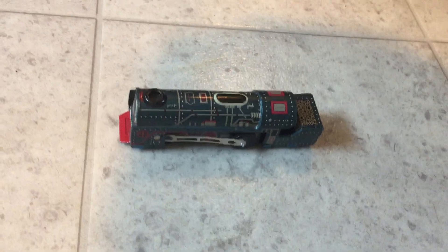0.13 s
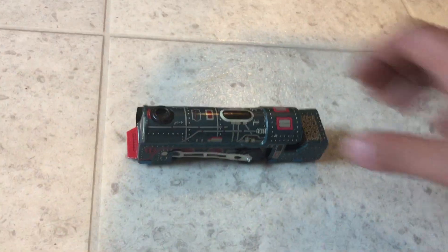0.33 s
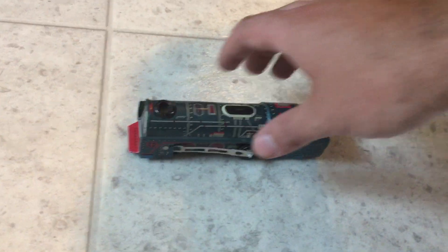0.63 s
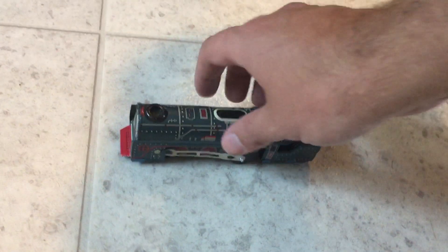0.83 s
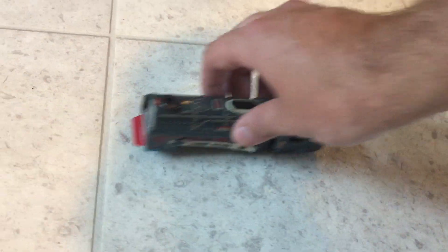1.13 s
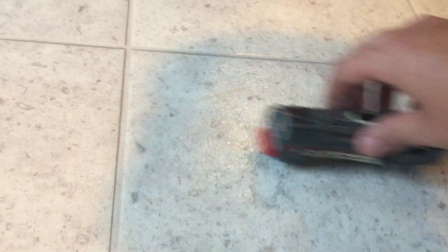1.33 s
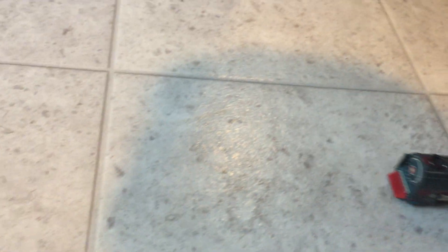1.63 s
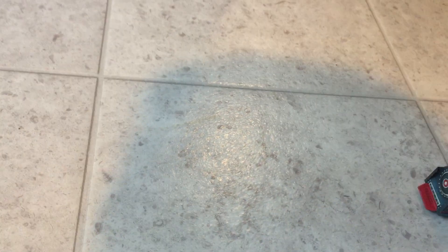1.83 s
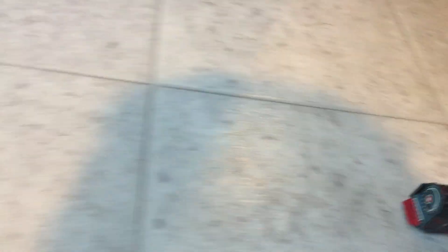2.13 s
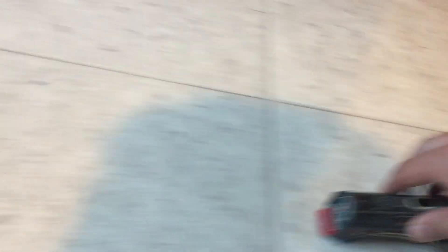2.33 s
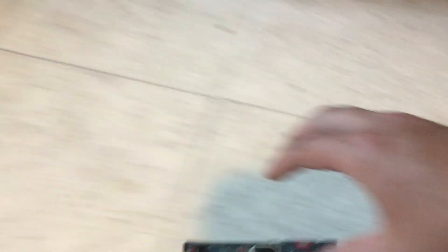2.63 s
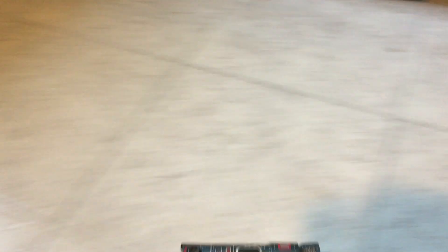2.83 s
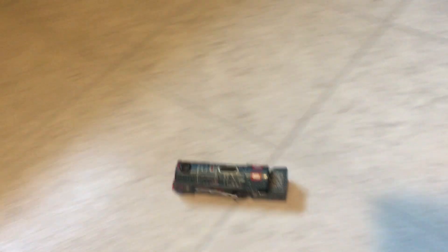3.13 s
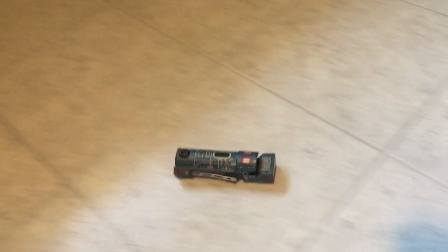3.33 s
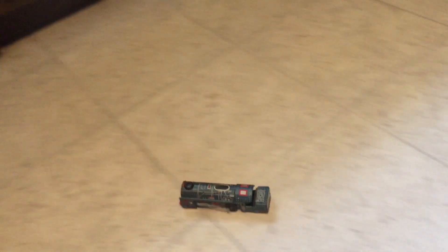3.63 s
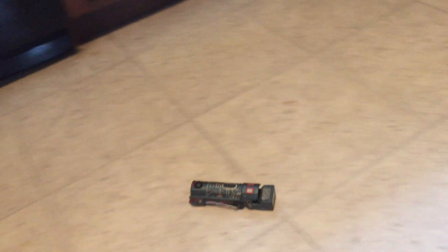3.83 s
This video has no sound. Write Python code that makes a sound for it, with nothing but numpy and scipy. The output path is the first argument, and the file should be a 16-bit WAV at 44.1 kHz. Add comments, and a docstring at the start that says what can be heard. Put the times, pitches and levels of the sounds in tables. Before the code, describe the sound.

Small friction-drive toy rattles, revs up with a rising rasp, then rolls away with grinding whir

```python
"""A tin friction train on a tiled floor. A low room hum comes first: coloured noise and a wavering sine.
A hand takes the toy up and sets it down: noise-burst clicks, scraping scuffs, panel knocks, dull bumps.
It pushes: the gears spin up a flywheel with a rising rasp of one impact per tooth, and the mesh whines.
Let go, the toy coasts away: the teeth slow, grind and rattle in the resonant tin shell,
the wheels rumble as low noise, and a thin squeal of narrow-band noise comes and goes."""
import sys
import numpy as np
from scipy import signal
from scipy.fft import rfft, irfft
from scipy.io import wavfile

SR = 44100
rng = np.random.default_rng(int(sys.argv[2]) if len(sys.argv) > 2 else 0)


def master(y):
    """Save y as 16-bit WAV."""
    cut = np.clip(np.atleast_2d(y).T, -1, 1)
    pcm = np.round(cut * 32767)  # scale
    wavfile.write(sys.argv[1], SR, pcm.astype(np.int16))


N = 176400
T = np.arange(N) / SR

# Gear speed. Each row: time in seconds, rate in teeth meshing per second.
MESH_RATE = [(2.13, 76), (2.16, 163), (2.245, 486), (2.38, 1050), (2.46, 1200), (2.55, 1230), (3.2, 946),
             (4.0, 670)]
# Gear force before GEAR_DB, shake and jolts. Each row: time in seconds, level in dB.
GEAR_DRIVE = [(2.13, -43), (2.134, -46), (2.176, -32.5), (2.3, -21), (2.426, -20.5), (2.51, -22),
              (3.776, -27.5), (3.962, -28), (4.0, -33.5)]
# Jolts of the rolling toy: gears rattle harder or briefly unload. Each row: time in seconds, change in dB.
JOLTS = [(2.28, -3), (2.325, -4), (2.545, -1), (2.642, -2), (2.665, 0), (2.72, 1), (2.889, 1.5),
         (3.022, -3), (3.129, -5.5), (3.215, 2.5), (3.385, 3.5), (3.485, 4.5), (3.605, 0.5), (3.654, -4.5),
         (3.681, 2), (3.755, -1.5), (3.855, 1), (3.9, -0.5), (3.965, 1)]
# Shell colour under the hand, just let go, further off. Each row: frequency in Hz, relative dB per Hz.
HELD_COLOUR = [(260, -72), (450, -26.5), (624, -15.5), (723, -19.5), (852, -14.5), (945, -6), (1160, -5),
               (1270, -5), (1470, 5.5), (1840, -3.5), (1930, 0), (2230, -1), (2370, 0), (2750, 1.5),
               (2960, -2), (3240, 3.5), (4980, -6.5), (5600, -5), (6040, 4), (7430, -0.5), (9560, 3.5),
               (10600, -7.5), (11600, -1), (13300, -1.5), (15600, -5.5)]
FREE_COLOUR = [(260, -52), (450, -34), (642, -16), (723, -25), (931, -11.5), (1050, -15), (1290, -8),
               (1370, -1), (1500, 2), (1900, -6), (2110, -1), (2300, -3.5), (2670, -2.5), (3240, -4.5),
               (3490, -2.5), (3700, -7), (3980, -4), (4490, -12.5), (5860, -3.5), (6900, -5), (7650, -10.5),
               (9420, -4.5), (10300, -10), (12700, -7.5), (15600, -10.5)]
AWAY_COLOUR = [(260, -60), (450, -44), (633, -17.5), (779, -22.5), (959, -12.5), (1050, -20), (1180, -10),
               (1310, -9), (1520, 2.5), (1640, -3.5), (1760, -0.5), (1900, -12), (2110, 1.5), (2270, -4.5),
               (2750, -2), (3190, -5), (3490, -3.5), (4620, -15.5), (5860, -5), (6800, -2), (7770, -11.5),
               (9560, -4.5), (10500, -12.5), (11400, -8), (15600, -10.5)]
# Modes of the tin shell. Each row: frequency in Hz, width in Hz, lift in dB.
TIN_MODES = [(1180, 13, 5.5), (1457, 33, 3), (1742, 20, 5), (2080, 50, 3.5), (2750, 36, 5), (3040, 9.9, 2),
             (3450, 30, 3), (4150, 52, 4), (5324, 120, 3.5), (5930, 95, 1), (8460, 104, 4),
             (9600, 115, 3.5), (11290, 145, 4.5), (12900, 230, 1.5)]
# Edges between the ranges of the shell that the shifting contact favours, in Hz.
CONTACT_EDGES_HZ = [1300, 1900, 2500, 3200, 4600, 6500, 8000, 10500, 12300]
# Clicks of gears and body in the hand. Each row: start in seconds, level in dB before CLICK_DB,
# treble in dB relative to the low part.
CLICKS = [(1.0108, -36, -26), (1.0824, -53, 10), (1.1087, -36, 5), (1.127, -33.5, 3.5), (1.1594, -28, 6),
          (1.1654, -34, -9), (1.1994, -30.5, -10), (1.707, -37, -10), (1.7141, -36.5, 9.5),
          (1.725, -25.5, -8), (1.7572, -30.5, -4), (1.7674, -36, 0), (1.7914, -47, 12),
          (1.8172, -37.5, 5.5), (1.882, -31.5, -14), (1.8882, -30, -7), (1.8928, -26.5, 0),
          (1.8969, -28, 7.5), (1.9072, -30.5, -1), (1.9609, -34, -3), (1.9819, -35.5, 10),
          (2.0017, -32, 14), (2.0132, -34, 12), (2.064, -41, 8), (2.0934, -39.5, 11), (2.1316, -33.5, 5),
          (2.1453, -36.5, 13.5)]
# Click and scuff colour. Each row: frequency in Hz, relative dB per Hz.
CLICK_COLOUR = [(410, -50), (700, -27), (818, -52), (908, -6), (1070, -20), (1530, 4.5), (1740, -7.5),
                (2030, -1), (2310, -3), (2740, -2), (4780, -15.5), (6530, -7.5), (7740, -14.5), (9280, -10),
                (10600, -16), (12800, -13), (15600, -19.5)]
# Wheels creeping and scuffing under the hand. Each row: start in seconds, length in seconds,
# level in dB before ring and colour, treble in dB relative to the low part, favoured ring in Hz.
SCUFFS = [(1.028, 0.17, -57, -2.5, 2000), (1.686, 0.061, -53.5, -13, 2250), (1.73, 0.16, -55.5, -16, 1350),
          (1.86, 0.21, -60, -6, 2620)]
# Knocks on a shell panel. Each row: start in seconds, frequency in Hz, level in dB.
KNOCKS = [(0.883, 2000, -63.5), (1.161, 2000, -43.5), (1.2, 2030, -48), (1.728, 2870, -36),
          (1.892, 2820, -43), (2.003, 3300, -38), (2.093, 3300, -41)]
# Wheels on the tiles. Each row: time in seconds, level in dB.
ROLL_LEVEL = [(2.13, -74), (2.3, -56.5), (2.45, -50), (2.53, -44), (2.6, -59), (2.9, -48.5), (3.3, -48.5),
              (3.5, -54.5), (3.88, -57.5), (3.935, -42), (4.0, -55)]
# Rolling colour. Each row: frequency in Hz, relative dB per Hz.
ROLL_COLOUR = [(45, -29), (72, 7), (110, -11.5), (160, 1), (245, -1.5), (340, -7.5), (480, -16),
               (900, -33.5)]
# Dull bumps of fingers and wheels. Each row: start in seconds, level in dB.
BUMPS = [(.719, -53.5), (.733, -60), (1.2, -61), (1.391, -52), (1.893, -55), (2.002, -62), (2.565, -51),
         (2.725, -45)]
# Bump colour. Each row: frequency in Hz, relative dB per Hz.
BUMP_COLOUR = [(60, -15), (170, 10), (400, -4), (630, 4), (900, -7.5), (1450, 0), (2800, -15), (6000, -44)]
# Room air colour. Each row: frequency in Hz, relative dB per Hz.
AIR_COLOUR = [(26, -39), (45, -6.5), (75, -9), (91, -6), (111, -1.5), (135, -14.5), (173, -3), (205, -15.5),
              (311, -20.5), (369, -29), (617, -31), (1060, -33), (1140, -33), (2050, -36), (2610, -40),
              (3420, -40), (4260, -42), (15600, -57)]

GEAR_DB, SHELL_DB, TEETH_PER_TURN = 0.5, -1.69, 27
TOOTH_SPREAD_DB, TOOTH_JITTER_S = 3.5, .00017
BACKLASH_PERIODS = .3   # timing spread of the unloaded teeth, in tooth periods
GRIT_PER_S, GRIT_DB, GRIT_SPREAD_DB = 3000, 3.5, 2   # scraping between the teeth
WOBBLE_DB, FLUTTER_DB, FLUTTER_HZ = 0.5, 1.04, 32.4   # the loose axle shakes the mesh
HELD_SHAKE = 0.27   # share of the shake left under the hand
JOLT_S = 0.0051
CONTACT_DB, CONTACT_HZ = 1.97, 22
RELEASE_S, RELEASE_FADE_S = 2.516, 0.1   # the hand lets go
DEPART_S, DEPART_FADE_S = 3.3, .5   # the toy rolls out into the room
HAND_NOTCH_HZ, HAND_NOTCH_WIDTH_HZ, HAND_NOTCH_DEPTH = 10520, 350, .85   # treble gap while held
WHINE_DB, WHINE_S, WHINE_WIDTH_S, WHINE_WAVER = -28, 2.425, 0.023, 0.0046
SQUEAL_HZ, SQUEAL_WIDTH_HZ, SQUEAL_DB, SQUEAL_S, SQUEAL_SPAN_S = 12950, 400, -36, 3.055, 0.12
CLICK_DB, CLICK_DECAY_S, TREBLE_HZ = -11.5, 0.0063, 4870
SCUFF_RING_DB, SCUFF_RING_WIDTH_HZ = 8, 87
KNOCK_WIDTH_HZ, KNOCK_DECAY_S = 560, 0.0064
BUMP_DECAY_S = 0.018
ROOM_T60_S, ROOM_DB, ROOM_GAP_S, ROOM_STEP_S, ROOM_DULL_HZ = 0.24, -12.5, .006, .25, 6000
AIR_DB, AIR_START_S = -54.5, .083
HUM_HZ, HUM_DB, HUM_WAVER, HUM_WAVER_HZ = 104.4, -57, 0.04, 6
LOW_CUT_HZ, CUTOFF_HZ = 27.4, 15720


def from_db(db):
    """Decibels to gain."""
    return 10 ** (np.asarray(db) / 20)


def rms_one(x):
    """Scale to rms 1."""
    return x / np.sqrt(np.mean(x ** 2) + 1e-20)


def in_time(rows):
    """A control curve at every sample."""
    return np.interp(T, *np.transpose(rows))


def fade(at_s, length_s):
    """A smooth step from 0 to 1, halfway at at_s."""
    return .5 + .5 * np.tanh(2 * (T - at_s) / length_s)


def bell(at_s, width_s):
    """Gaussian swell; width is the standard deviation."""
    return np.exp(-.5 * ((T - at_s) / width_s) ** 2)


def lowpass(x, hz):
    """Gentle first-order treble cut."""
    return signal.sosfilt(signal.butter(1, hz, fs=SR, output="sos"), x)


def resonate(x, hz, width_hz):
    """One resonance, gain 1 on top."""
    r = np.exp(-np.pi * width_hz / SR)
    zeros = np.array([1, 0, -1]) * (1 - r * r) / 2
    poles = [1, -2 * r * np.cos(2 * np.pi * hz / SR), r * r]
    return signal.lfilter(zeros, poles, x + 1e-18)


def flutter(hz):
    """Random swings in the two octaves round a rate; rms 1."""
    band = signal.butter(2, [hz / 2, hz * 2], "band", fs=SR, output="sos")
    return rms_one(signal.sosfilt(band, rng.standard_normal(N)))


def coloured(x, spectrum):
    """Minimum-phase filter with the given spectrum, falling away below it; white noise keeps its power."""
    size = 2 * N
    hz, db = np.transpose(spectrum)
    f = np.maximum(np.arange(N + 1) * SR / size, 1)
    gain = from_db(np.interp(np.log(f), np.log(hz), db))
    gain = rms_one(gain * np.minimum(f / hz[0], 1) ** 2)
    # folding the cepstrum makes the filter causal
    cepstrum = irfft(np.log(gain))
    cepstrum[1:N] *= 2
    cepstrum[N + 1:] = 0
    return irfft(rfft(x, size) * np.exp(rfft(cepstrum)))[:N]


def grit():
    """Dense random micro-impacts; rms 1."""
    born = rng.random(N) < GRIT_PER_S / SR
    strength = from_db(GRIT_SPREAD_DB * rng.standard_normal(N))
    return rms_one(born * rng.choice([-1, 1], N) * strength)


def blows(rows, decay_s):
    """Envelope of (s, dB) blows: instant rise, exponential fall."""
    power = np.zeros(N)
    for s, db in rows:
        power[int(s * SR)] += from_db(db) ** 2
    return np.sqrt(signal.lfilter([1], [1, -np.exp(-2 / (decay_s * SR))], power + 1e-22))


def gears():
    """One impact per tooth plus scraping, shaken by the axle, sounds through the shell."""
    rate, running = in_time(MESH_RATE), T > MESH_RATE[0][0]
    free, away = fade(RELEASE_S, RELEASE_FADE_S), fade(DEPART_S, DEPART_FADE_S)
    teeth = np.cumsum(rate * running) / SR
    at = np.flatnonzero(np.diff(np.floor(teeth)))

    late_s = rng.standard_normal(len(at)) * (TOOTH_JITTER_S + BACKLASH_PERIODS * free[at] / rate[at])
    strength = from_db(TOOTH_SPREAD_DB * rng.standard_normal(len(at)))
    struck = np.clip(at + (late_s * SR).astype(int), 0, N - 1)
    impacts = np.zeros(N)
    impacts[struck] = strength * np.sqrt(SR / rate[at])   # even power at any rate
    force = (impacts + from_db(GRIT_DB) * grit()) * running

    wobble_db = WOBBLE_DB * np.sin(2 * np.pi * teeth / TEETH_PER_TURN)
    shake_db = wobble_db + FLUTTER_DB * flutter(FLUTTER_HZ)
    shake_db = shake_db * (HELD_SHAKE + (1 - HELD_SHAKE) * free)
    jolt_db = sum(db * np.exp(-((T - s) / JOLT_S) ** 2) for s, db in JOLTS)
    level_db = in_time(GEAR_DRIVE) + GEAR_DB + shake_db + jolt_db
    force = shifting(force / np.std(force[running])) * from_db(level_db)

    held = coloured(force, HELD_COLOUR)
    held -= HAND_NOTCH_DEPTH * resonate(held, HAND_NOTCH_HZ, HAND_NOTCH_WIDTH_HZ)
    let_go = (1 - away) * coloured(force, FREE_COLOUR) + away * coloured(force, AWAY_COLOUR)
    shell = (1 - free) * held + free * let_go
    return from_db(SHELL_DB) * tin(inside(shell))


def shifting(x):
    """The shifting contact makes each range of the spectrum swell and sink on its own."""
    lows = [signal.sosfiltfilt(signal.butter(2, hz, fs=SR, output="sos"), x) for hz in CONTACT_EDGES_HZ]
    bands = np.diff([0 * x, *lows, x], axis=0)
    return sum(band * from_db(CONTACT_DB * flutter(CONTACT_HZ)) for band in bands)


def inside(x, decay_s=0.0026):
    """Quick reflections in the hollow body smear each impact: allpass delays in series."""
    for lag in (np.array([.0007, .0011, .0019]) * SR).astype(int):
        g = np.exp(-lag / SR / decay_s)
        x = signal.lfilter(np.r_[-g, np.zeros(lag), 1], np.r_[1, np.zeros(lag), -g], x)
    return x


def tin(x):
    """The narrow modes of the tin shell ring on after each impact."""
    for hz, width_hz, lift_db in TIN_MODES:
        x = x + (from_db(lift_db) - 1) * resonate(x, hz, width_hz)
    return x


def whine():
    """The mesh tone sings out at the hardest push, while the gears are loaded."""
    hz = in_time(MESH_RATE) * (1 + WHINE_WAVER * flutter(FLUTTER_HZ))
    tone = np.sin(2 * np.pi * np.cumsum(hz) / SR)
    return from_db(WHINE_DB) * bell(WHINE_S, WHINE_WIDTH_S) * tone


def squeal():
    """Friction in a dry bearing: a thin, fluttering whistle that comes and goes."""
    ring = resonate(grit(), SQUEAL_HZ, SQUEAL_WIDTH_HZ)
    ring = rms_one(resonate(ring, SQUEAL_HZ, SQUEAL_WIDTH_HZ))
    level = from_db(SQUEAL_DB + FLUTTER_DB * flutter(FLUTTER_HZ))
    return ring * level * bell(SQUEAL_S, SQUEAL_SPAN_S)


def handling():
    """Rattling clicks, each with its own brightness, and ringing scuffs excite the shell; panels knock."""
    noise = rng.standard_normal(N)
    low = lowpass(noise, TREBLE_HZ)
    force = low * blows([(s, db) for s, db, treble_db in CLICKS], CLICK_DECAY_S)
    force += (noise - low) * blows([(s, db + treble_db) for s, db, treble_db in CLICKS], CLICK_DECAY_S)
    force *= from_db(CLICK_DB)

    scrape = grit()
    dull = lowpass(scrape, TREBLE_HZ)
    for s, length_s, db, treble_db, hz in SCUFFS:
        swell = np.sin(np.pi * np.clip((T - s) / length_s, 0, 1))
        rub = (dull + from_db(treble_db) * (scrape - dull)) * from_db(db) * swell
        force += rub + from_db(SCUFF_RING_DB) * resonate(rub, hz, SCUFF_RING_WIDTH_HZ)

    knocks = np.zeros(N)
    for s, hz, db in KNOCKS:
        panel = rms_one(resonate(scrape, hz, KNOCK_WIDTH_HZ))
        knocks += panel * blows([(s, db)], KNOCK_DECAY_S)
    return tin(coloured(force, CLICK_COLOUR)) + knocks


def wheels():
    """Rolling contact rumbles as low noise; bumps are dull decaying bursts."""
    roll = from_db(in_time(ROLL_LEVEL)) * coloured(rng.standard_normal(N), ROLL_COLOUR)
    bumps = coloured(blows(BUMPS, BUMP_DECAY_S) * rng.standard_normal(N), BUMP_COLOUR)
    return roll + bumps


def room(x):
    """A short, dull tail of reflections, different at each place along the way."""
    t, out = T[:SR // 2], np.zeros(N)
    for place_s in np.arange(0, T[-1] + ROOM_STEP_S, ROOM_STEP_S):
        tail = lowpass(rng.standard_normal(len(t)), ROOM_DULL_HZ)
        tail = tail * from_db(-60 * t / ROOM_T60_S) * (t > ROOM_GAP_S)
        near = np.sqrt(np.maximum(1 - np.abs(T - place_s) / ROOM_STEP_S, 0))
        out += signal.fftconvolve(x * near, tail / np.linalg.norm(tail))[:N]
    return from_db(ROOM_DB) * out


def background():
    """Low room noise with a hum of randomly wavering pitch."""
    hz = HUM_HZ * (1 + HUM_WAVER * flutter(HUM_WAVER_HZ))
    hum = np.sqrt(2) * np.sin(2 * np.pi * np.cumsum(hz) / SR)
    air = coloured(rng.standard_normal(N), AIR_COLOUR)
    return (from_db(AIR_DB) * air + from_db(HUM_DB) * hum) * (T > AIR_START_S)


def scene():
    """The toy in the room, the same in both channels."""
    toy = gears() + whine() + squeal() + handling() + wheels()
    return np.tile(toy + room(toy) + background(), (2, 1))


def record(dry):
    """The deep bass rolls off and the top is cut steeply."""
    dry = signal.sosfilt(signal.butter(4, LOW_CUT_HZ, "high", fs=SR, output="sos"), dry)
    return signal.sosfilt(signal.ellip(12, .1, 80, CUTOFF_HZ, fs=SR, output="sos"), dry)


dry = scene()
out = record(dry)
master(out)
```